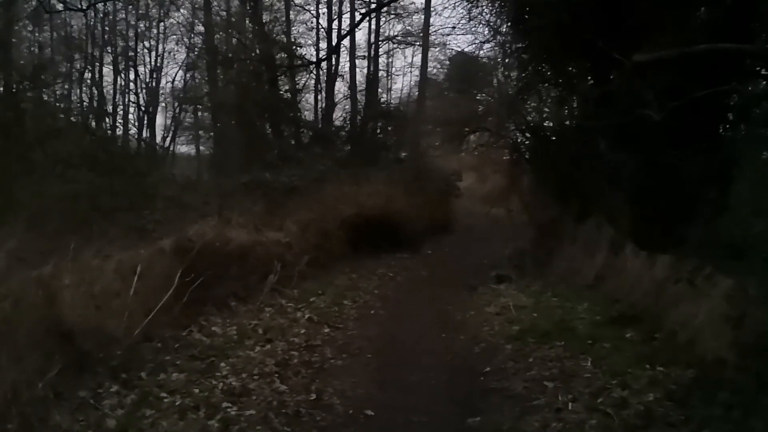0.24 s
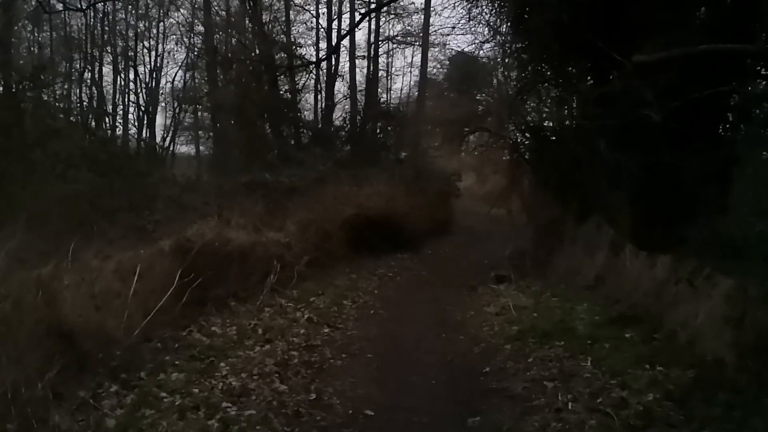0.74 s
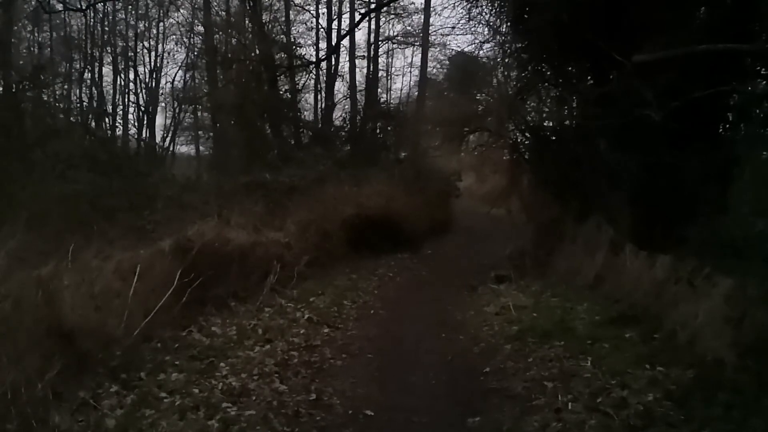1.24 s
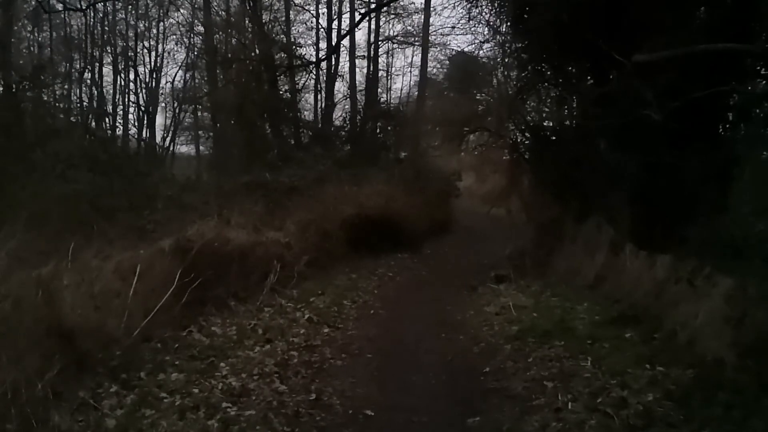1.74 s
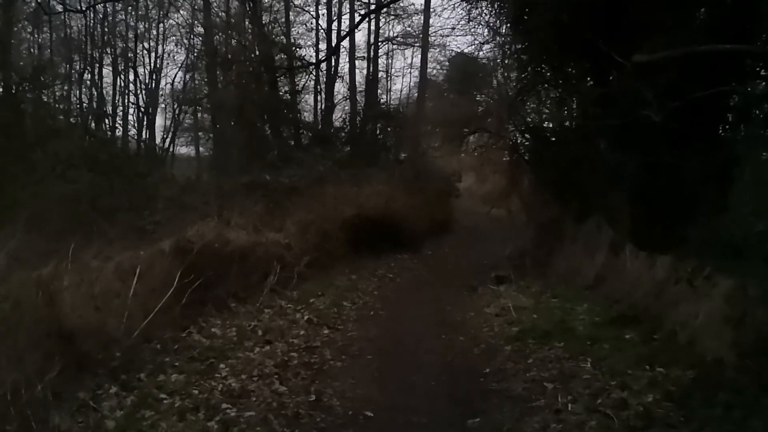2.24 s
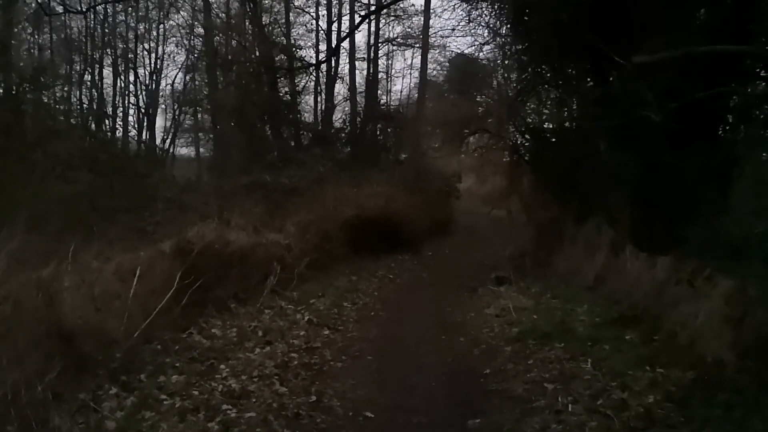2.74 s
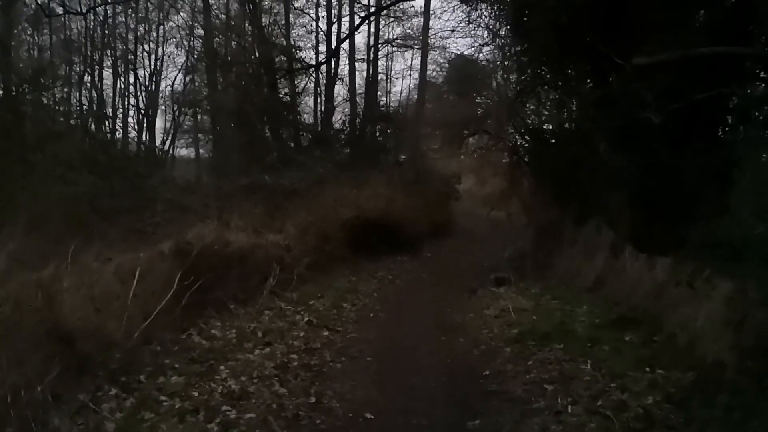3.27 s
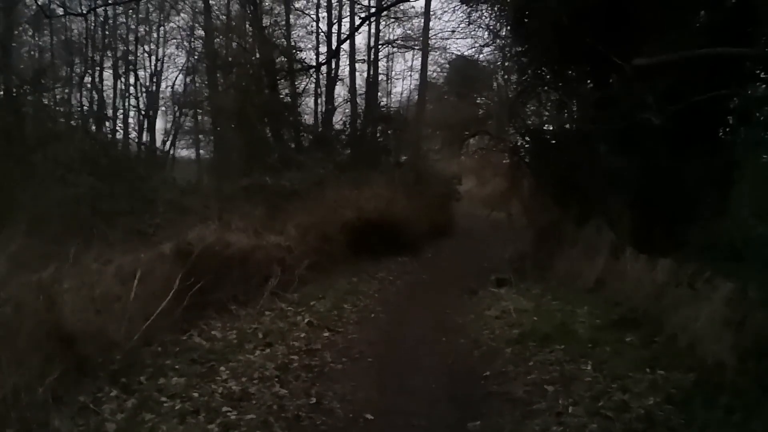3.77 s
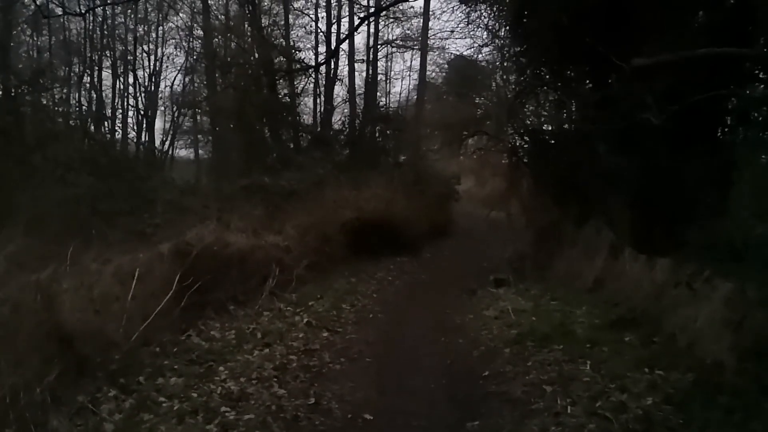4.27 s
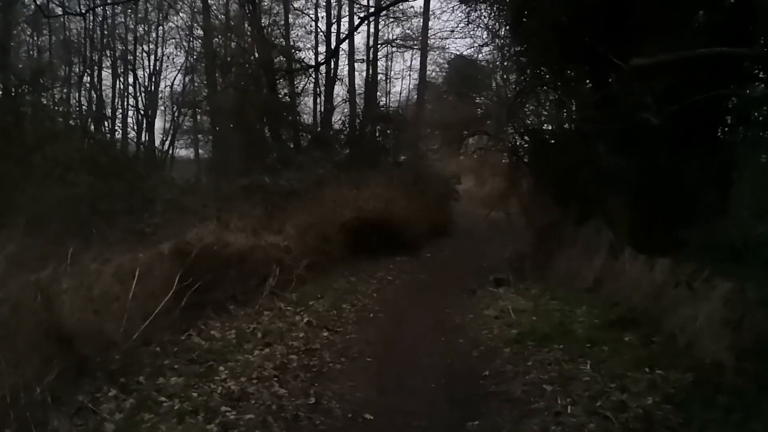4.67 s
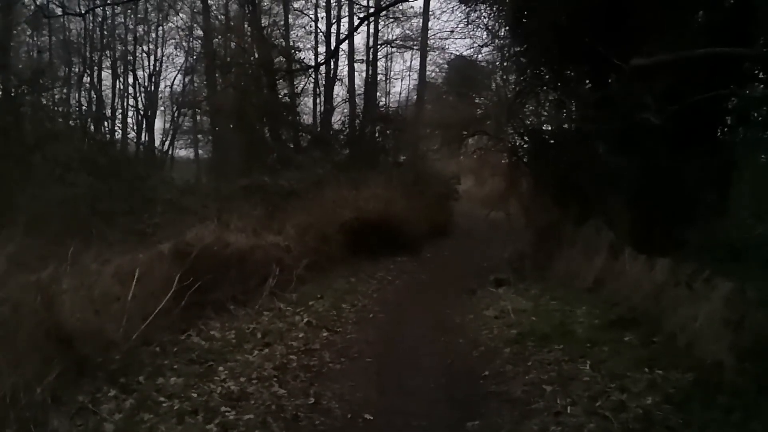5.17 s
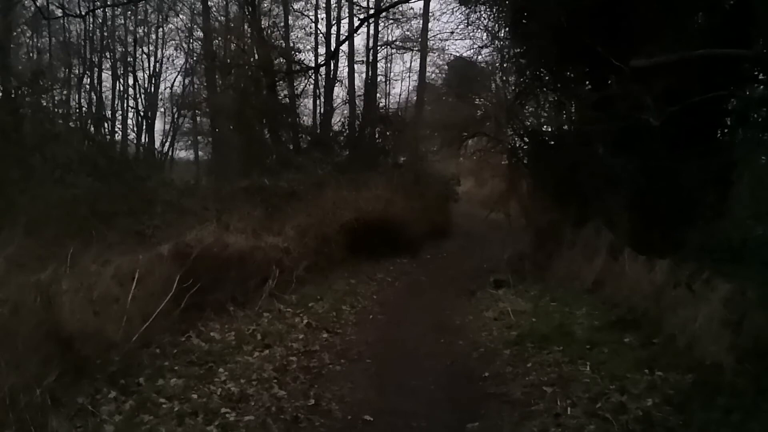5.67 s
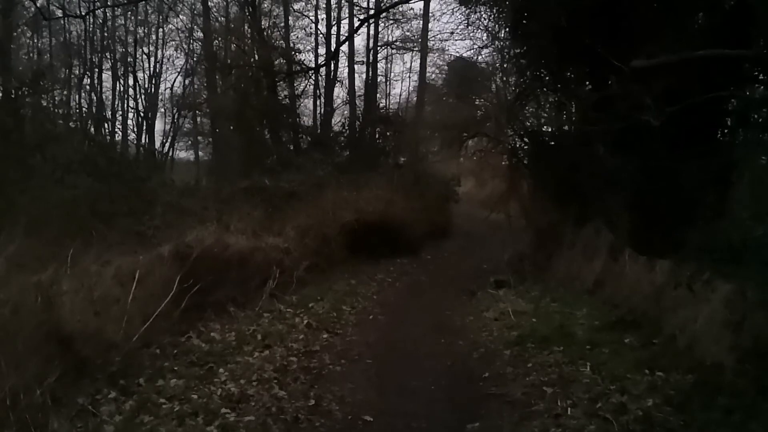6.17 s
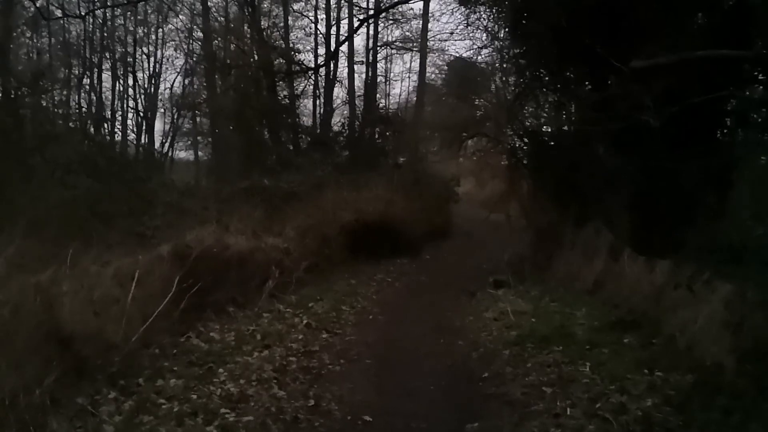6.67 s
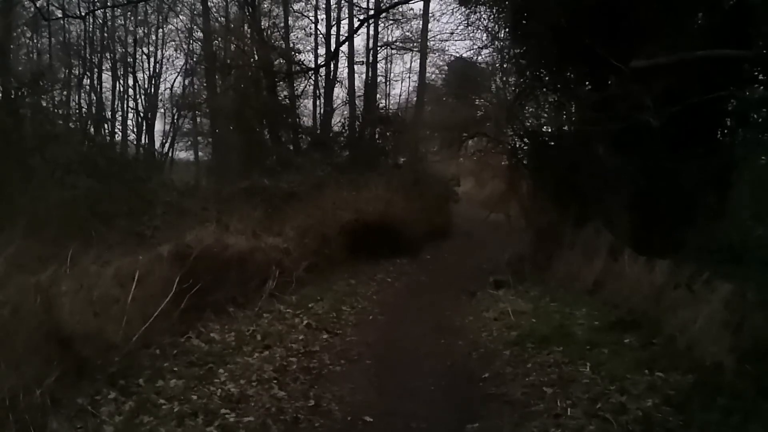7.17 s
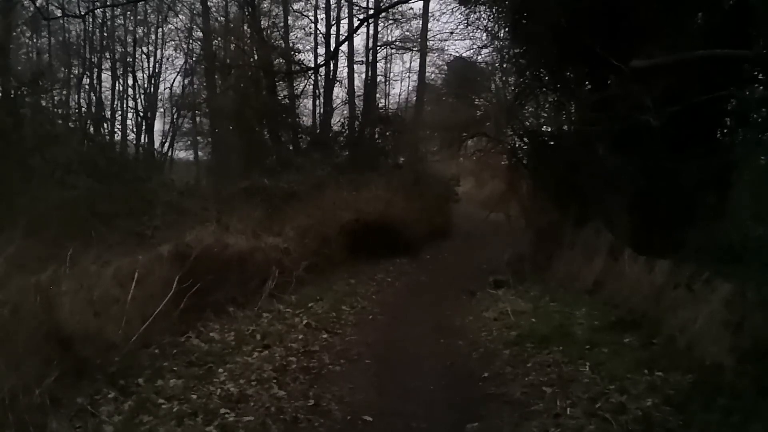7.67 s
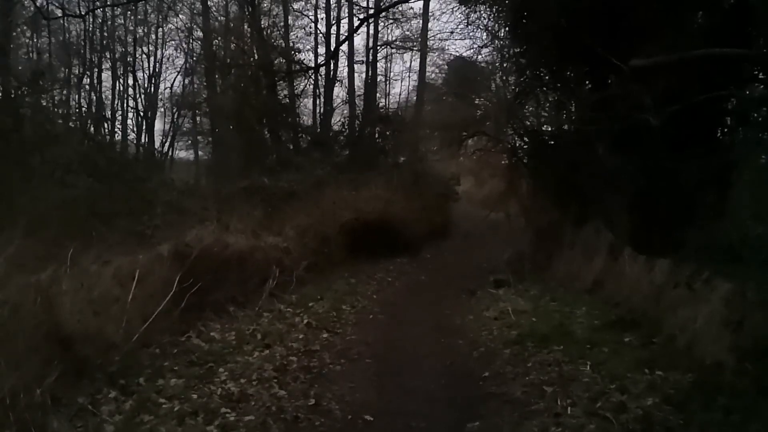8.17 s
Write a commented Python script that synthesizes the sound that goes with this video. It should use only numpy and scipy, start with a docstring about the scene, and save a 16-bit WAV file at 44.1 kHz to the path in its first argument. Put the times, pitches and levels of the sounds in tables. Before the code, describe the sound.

Two dogs trade sharp double barks in a dusky wood, echoing off the trunks and thinning out over low rumble and a faint water trickle.

```python
"""Dusk in a wood, heard by a spaced microphone pair. The tail of one double bark opens the scene. Then two animals
trade double barks near 1 kHz, one off to the left, one farther ahead: overtones and breath noise from a
throat, scattered by the trunks into a half-second noise tail; low thuds follow some of them. Throughout, water
(bubble tones) trickles on the right, ticks (ringing noise) snap, and a rumble, a hum and a far wash (shaped noise)
lie behind. Faint moans (narrow noise) come from about 1 s on, paired bird whistles from about 2.4 s on."""
import sys
import numpy as np
from scipy import signal
from scipy.fft import rfft, irfft, next_fast_len
from scipy.io import wavfile
from scipy.ndimage import uniform_filter1d

SR = 44100
rng = np.random.default_rng(int(sys.argv[2]) if len(sys.argv) > 2 else 0)


def makeup_ratio(level_db):
    """Linear amplitude ratio for a level in decibels (20 dB per factor of ten)."""
    decades = np.asarray(level_db, float) / 20
    return 10 ** decades


def log_audio(samples):
    """Write samples as a 16-bit WAV file to the path given in sys.argv[1]."""
    # one column per channel
    frames = np.atleast_2d(samples).T
    # limit to full scale, then quantise
    limited = np.clip(frames, -1, 1)
    pcm = np.round(limited * 32767).astype(np.int16)
    wavfile.write(sys.argv[1], SR, pcm)


N = 371322
LEAD = SR // 4  # samples played before time zero, for a bark already ringing

# Fading of scattered sound among leaves and over soft ground. Each row: frequency in Hz, change in dB per s.
TREBLE_LOSS = [(500, -30), (3000, -32), (6000, -43.5), (12000, -47)]


def evened(x):
    """Scales to rms 1."""
    return x / np.sqrt(np.mean(x ** 2) + 1e-20)


def read(points, hz):
    """Reads a spectrum table on a log-frequency axis."""
    f, value = np.transpose(points)
    return np.interp(np.log(hz + 1), np.log(f + 1), value)


def curve(rows):
    """Joins (s, value) rows by straight lines, one value a sample."""
    return np.interp(np.arange(N) / SR, *np.transpose(rows))


def empty_mix():
    """Two silent channels with the lead-in ahead."""
    return np.zeros((2, LEAD + N))


def add(mix, s, sound):
    """Mixes a two-channel sound in at s seconds, counted after the lead-in."""
    part = mix[:, LEAD + round(s * SR):][:, :sound.shape[1]]
    part += sound[:, :part.shape[1]]


def resonate(x, hz, width):
    """A steep resonance of gain 1: shift down, smooth twice, shift back."""
    turn = np.exp(2j * np.pi * hz * np.arange(len(x)) / SR)
    r = np.exp(-np.pi * abs(width) / SR)
    smooth = signal.lfilter([(1 - r) ** 2], [1, -2 * r, r * r], x / turn)
    return 2 * (turn * smooth).real


def sided(x, pan_db, lag_s):
    """Spaced pair: the right microphone hears x lag_s later and pan_db weaker (negative: sooner, louder)."""
    size = next_fast_len(len(x) + 128)
    delay = np.array([[0], [lag_s]]) + 32 / SR  # 32 samples to spare let the right one lead
    late = np.exp(-2j * np.pi * np.fft.rfftfreq(size, 1 / SR) * delay)
    return irfft(rfft(x, size) * late, size) * makeup_ratio([[pan_db / 2], [-pan_db / 2]])


def bark(level_db, length_s, bend_hz, voice, pipe, gasp, breath_db, jitter, rises):
    """A clean overtone stack on a bending pitch, plus breath puffed each cycle through the windpipe."""
    t = np.arange(round(length_s * SR)) / SR
    u = t / length_s
    pitch = np.polyval(np.polyfit([0, .5, 1], bend_hz, 2), u)
    falling = bend_hz[0] > bend_hz[1]  # a bark that starts by falling in pitch is hoarser and whistles
    wobble, shimmer, air = rng.standard_normal((3, SR // 8))[:, :len(u)]
    wobble = jitter * (1 + 2.2 * falling) * evened(uniform_filter1d(wobble, size=130))
    turns = np.cumsum(pitch * (1 + wobble)) / SR
    rise_s = rises[int(falling)]
    fall = np.minimum((1 - u) / .4, 1) ** .7
    catch = np.clip((t - .005) / rise_s, 0, 1)  # the voice catches after the air has started

    tone = evened(sum(makeup_ratio(falling_db if falling else rising_db) * np.cos(2 * np.pi * k * turns + 0.893 * k * k)
                      for k, falling_db, rising_db in voice))
    tone = tone * (1 + .22 * evened(uniform_filter1d(shimmer, size=160)))  # uneven strength, cycle to cycle
    puffs = (0.25 + np.exp(-(turns % 1) / 0.11)) * air
    breath = evened(sum(makeup_ratio(db) * evened(resonate(puffs, hz, width)) for hz, width, db in pipe))
    breath = makeup_ratio(breath_db) * breath * np.minimum(t / rise_s, 1)
    # the first air through the nearly shut mouth
    whistle = sum(makeup_ratio(db) * evened(resonate(air, hz, width)) * t / peak_s * np.exp(1 - t / peak_s)
                  for hz, width, db, peak_s in gasp)

    x = (tone * catch + breath + falling * whistle) * fall
    # a small mouth radiates no bass; the band ends softly near 12 kHz
    band = signal.butter(4, [600, 12000], "bandpass", fs=SR, output="sos")
    return makeup_ratio(level_db) * signal.sosfilt(band, x)


def trees(x, loss, lag_s):
    """Countless trunks return the sound as a noise tail; the first returns are partly alike, lag_s apart."""
    # Each row: delay in s, level at the left in dB, level at the right in dB.
    returns = [(.004, -4, -6), (.03, 0, -2), (.12, -9, -5.5), (.2, -18, -18), (.35, -28, -28),
               (.8, -48, -48)]
    left, other = rng.standard_normal((2, SR * 4 // 5))
    same = .7 * np.exp(-np.arange(len(left)) / SR / .05)  # likeness of the two microphones
    right = same * np.roll(left, round(lag_s * SR)) + np.sqrt(1 - same ** 2) * other
    hz, t, z = signal.stft(np.array([left, right]), SR, nperseg=128)
    tail = signal.istft(z * makeup_ratio(t * read(loss, hz)[:, None]), SR, nperseg=128)[1]
    s, left_db, right_db = np.transpose(returns)
    t = np.arange(tail.shape[1]) / SR
    tail = tail * makeup_ratio([np.interp(t, s, db, left=-99) for db in (left_db, right_db)])
    # trunks stand in clumps, so the returns flutter
    clumps = evened(uniform_filter1d(rng.standard_normal(len(t)), size=500))
    tail = tail * makeup_ratio(3 * clumps)
    return signal.fftconvolve(x[None], tail / np.sqrt(SR / 10), axes=1)


def animal(barks, shape, pan_db, lag_s, wet_db, loss, **throat):
    """Each pair is two barks; each arrives direct from its side, then from the trees all round."""
    mix = empty_mix()
    for s, gap, first_db, second_db, pitch_hz in barks:
        for when, db, (length_s, *bend) in zip((s, s + gap), (first_db, second_db), shape):
            x = bark(db, length_s, np.multiply(bend, pitch_hz), **throat)
            add(mix, when, sided(x, pan_db, lag_s))
            add(mix, when, makeup_ratio(wet_db) * trees(x, loss, lag_s))
    return mix[:, LEAD:]


def left_animal():
    """The nearer throat, off to the left: sound reaches the left microphone first and stronger."""
    # Each row: start in s, s to the second bark, level of the first in dB, of the second in dB, pitch in Hz.
    barks = [(-.185, 0.13, -33, -33, 1005), (.608, 0.12, -29, -29.5, 1002),
             (1.862, 0.1, -33.5, -30.5, 1020), (3.622, .1, -34.5, -30.5, 990),
             (6.522, 0.096, -35.5, -30.5, 993)]
    # First and second bark, each row: length in s, then start, middle and end as shares of the pitch.
    shape = [(0.055, 1.009, .987, .912), (0.066, .935, 1.001, 0.93)]
    # Overtones, each row: multiple of the pitch, relative dB if the pitch starts falling, dB if rising.
    voice = [(1, 3.5, 1), (2, 2.5, 2), (3, -10.5, -14.5), (4, 5, 3.5), (5, -4.5, -3), (6, -34, -16.5),
             (7, -13, -16.5), (8, -42, -29), (9, -41, -25)]
    # Windpipe resonances, each row: frequency in Hz, width in Hz, relative level in dB.
    pipe = [(637, 46, -18.5), (883, 115, -9), (1620, 370, -0.5), (3120, 920, -14), (3740, 700, 5.5),
            (5430, 900, -3), (7300, 300, -13), (9420, 200, -19.5)]
    # Whistle of the first air, each row: frequency in Hz, width in Hz, dB against the voice, s to its peak.
    gasp = [(2894, 51, -3.5, 0.0022), (5300, 270, -21, 0.0015)]
    return animal(barks, shape, pan_db=3.5, lag_s=.000363, wet_db=0.5, loss=TREBLE_LOSS,
                  voice=voice, pipe=pipe, gasp=gasp, breath_db=-7.0, jitter=.008,
                  rises=(.022, .008))  # s, for a rising and a falling start


def ahead_animal():
    """The farther throat, nearly straight ahead: breathier, weaker, with less of the scattered tail."""
    # Each row: start in s, s to the second bark, level of the first in dB, of the second in dB, pitch in Hz.
    barks = [(.432, .056, -42.5, -40, 1022), (4.876, .052, -44, -40, 1034)]
    # First and second bark, each row: length in s, then start, middle and end as shares of the pitch.
    shape = [(.084, 1.017, 1, .93), (.059, .968, 0.96, 1.005)]
    # Overtones, each row: multiple of the pitch, relative dB if the pitch starts falling, dB if rising.
    voice = [(1, -13, -5), (2, -17.5, 2.5), (3, -13.5, -0.5), (4, -9.5, 0.5), (5, -15, -3), (6, -16, -22),
             (7, -30, -31), (8, -26, -10), (9, -40, -23)]
    # Windpipe resonances, each row: frequency in Hz, width in Hz, relative level in dB.
    pipe = [(699, 48, -12.5), (794, 73, -16), (1080, 120, -2), (1600, 53, -12.5), (2740, 890, -3),
            (3720, 940, 4.5), (5440, 320, -0.5), (7050, 710, -1), (9150, 380, -52)]
    # Whistle of the first air, each row: frequency in Hz, width in Hz, dB against the voice, s to its peak.
    gasp = [(1112, 53, -5, 0.008), (4080, 81, -3, 0.0036)]
    # Fading of its scattered sound, each row: frequency in Hz, change in dB per s.
    loss = [(500, -50), (1500, -45), (3000, -30), (4100, 0), (6000, -25), (12000, -70)]
    return animal(barks, shape, pan_db=1.5, lag_s=-.00007, wet_db=-1.5, loss=loss,
                  voice=voice, pipe=pipe, gasp=gasp, breath_db=-1.0, jitter=.006,
                  rises=(.016, .009))  # s, for a rising and a falling start


def drip(db, hz, cycles, rise):
    """A bubble: a few cycles that die fast and bend upward."""
    u = np.arange(round(4 * cycles * SR / hz)) * hz / SR / cycles  # time in decay lengths
    start = 1 - np.exp(-u / .1)
    return makeup_ratio(db) * np.sin(2 * np.pi * cycles * (u + rise * u ** 2)) * start * np.exp(-u)


def trickle(per_s, small_db, spread_db):
    """Bubbles in water: the loudest at their moments, many small ones at random, to the right."""
    # Loudest drips, each row: s (the drip starts 2 ms sooner), dB before decay and panning, starting pitch in Hz.
    loudest = [(1.0091, -53.5, 2130), (1.2092, -54, 2100), (1.4247, -56, 2216), (2.6, -57, 1600),
               (2.6404, -59, 1900), (2.825, -55, 2080), (2.9667, -55, 1410), (3.0834, -55.5, 2030),
               (3.1323, -52, 2060), (3.5478, -52.5, 1160), (4.2388, -53, 2910), (4.356, -55, 2170),
               (4.6234, -57, 1960), (5.3203, -52.5, 2020), (5.8935, -58, 2080), (5.913, -56, 2220),
               (6.3175, -52.5, 1550), (6.3684, -50, 1600), (6.9995, -56, 2200), (7.428, -57, 2010),
               (7.6565, -57.5, 1610), (7.7298, -57, 2530), (7.9229, -57, 2260)]
    mix = empty_mix()
    for s, db, hz in loudest:
        add(mix, s - .002, sided(drip(db, hz, cycles=9.8, rise=0.013), pan_db=-10, lag_s=-0.00044))
    for when, size, a, b, pan in rng.random((4000, 5))[:round(per_s * N / SR)]:
        db = small_db - spread_db * np.log(1 - .95 * size)  # few are loud
        small = drip(db, hz=1100 * 1.7 ** (a + b), cycles=8 + 14 * pan, rise=.01)
        add(mix, when * N / SR, sided(small, -6 * pan, -.0003 * pan))
    return mix[:, LEAD:]


def ticks(count=12):
    """Short bright snaps to the right, noise ringing for some milliseconds; count more fall at random."""
    # Dry ticks in the leaves, each row: start in s, level in dB before decay and panning, frequency in Hz.
    placed = [(.859, -50, 9200), (1.742, -72, 6600), (3.518, -71, 6650), (5.848, -74, 6700),
              (5.905, -70, 7300), (5.922, -72, 6800)]
    mix, t = empty_mix(), np.arange(600) / SR
    scattered = [(a * N / SR, -67 - 4 * b, 6600 * (0.96 + 0.18 * c)) for a, b, c in rng.random((count, 3))]
    for s, db, hz in [*placed, *scattered]:
        x = evened(resonate(rng.standard_normal(600), hz, 1400)) * np.exp(-t / 0.0032)
        add(mix, s, sided(makeup_ratio(db) * x, pan_db=-14.5, lag_s=-0.00018))
    return mix[:, LEAD:]


def songbird():
    """Two whistles at once that flick up and slide down, blurred by the trees."""
    # Each row: start in s, dB of the lower tone before panning, length in s, dB of the upper tone (1.5 is added).
    chirps = [(2.353, -68, 0.059, -4), (2.592, -70.5, .045, -5), (4.03, -72.5, 0.054, -2),
              (4.261, -74.5, 0.035, -14), (7.768, -72, .06, 7), (7.996, -75, 0.05, -6)]
    top_hz, peak_s, rise_hz_per_s, fall_hz_per_s = 4470, .016, 11000, 11000  # before the peak is rounded
    mix = empty_mix()
    for s, db, length_s, upper_db in chirps:
        t = np.arange(round(length_s * SR)) / SR - peak_s
        sag = np.maximum(-rise_hz_per_s * t, fall_hz_per_s * t)
        turns = np.cumsum(top_hz - uniform_filter1d(sag, size=300, mode="nearest")) / SR
        lower = np.sin(2 * np.pi * turns)
        upper = makeup_ratio(upper_db + 1.5 - 320 * abs(t)) * np.sin(2 * np.pi * 1.36 * turns)
        x = makeup_ratio(db) * (lower + upper) * signal.windows.tukey(len(t), .6)
        add(mix, s, sided(x, pan_db=-3.2, lag_s=-0.00021))
        add(mix, s, makeup_ratio(2) * trees(x, TREBLE_LOSS, -.00025))
    return mix[:, LEAD:]


def moans():
    """Far, faint, fuzzy: narrow noise tones that swell and fade, centred."""
    # Each row: start in s, level in dB before the swell, length in s, frequency in Hz, width in Hz.
    calls = [(0.946, -70, 0.45, 1280, 41.6), (2.43, -72.5, 0.083, 330, 59.6), (4.75, -65.5, 0.56, 333, 88),
             (7.58, -70, 0.12, 338, 60)]
    mix = empty_mix()
    for s, db, length_s, hz, width in calls:
        x = evened(resonate(rng.standard_normal(SR)[:round(length_s * SR)], hz, width))
        add(mix, s, sided(makeup_ratio(db) * x * np.hanning(len(x)), 0, 0))
    return mix[:, LEAD:]


def thuds():
    """A dip in air pressure with a swing before and after, alike at both microphones."""
    # Low thuds, each just after a bark. Each row: s of the dip, peak in dB, frequency in Hz.
    dips = [(.547, -46.5, 54), (.819, -42, 41), (2.066, -45, 50.7), (3.692, -43.5, 48), (3.848, -47.5, 44),
            (4.99, -45.5, 58), (6.699, -42.5, 55)]
    s, db, hz = np.transpose(dips)[:, :, None]
    turns = (np.arange(N) / SR - s) * hz
    swell = np.exp(-(turns / 0.6) ** 2)  # 0.6 cycles either way
    return -(makeup_ratio(db) * np.cos(2 * np.pi * turns) * swell).sum(axis=0)


def noise(points, patchy_db):
    """Random short-time spectra of the given colour, with drifting patches, at rms 1."""
    frames, hz = N // 512 + 5, np.fft.rfftfreq(2048, 1 / SR)
    a, b, patches = rng.standard_normal((frames, 1025, 3)).T
    patches = uniform_filter1d(patches, size=16, axis=0)
    patches = evened(uniform_filter1d(patches, size=5, axis=1))
    z = (a + 1j * b) * makeup_ratio(read(points, hz)[:, None] + patchy_db * patches)
    return evened(signal.istft(z, nperseg=2048, noverlap=1536)[1][:N])


def distance():
    """Rumble and hum reach both microphones nearly alike; the far wash above them differs between the two."""
    # Colour of the rumble, each row: frequency in Hz, relative level in dB per Hz.
    rumble_colour = [(11, -20), (18, 0), (54, 5), (102, -13.5), (114, -8.5), (134, -20), (170, -21),
                     (220, -32.5), (370, -120)]
    # Swell of the rumble, each row: time in s, level in dB.
    rumble_swell = [(0, -62), (.5, -57), (1.55, -60), (2.86, -59), (3.1, -61), (5, -60), (8.42, -60.5)]
    # Swell of the hum, each row: time in s, level in dB.
    hum_swell = [(0, -73), (3.2, -74.5), (3.8, -66.5), (8.42, -65)]
    # Wash in the sum of the two microphones, each row: frequency in Hz, relative level in dB per Hz.
    mid_colour = [(76, -33), (130, 1.5), (169, -5.5), (340, -8.5), (538, -19), (1000, -12.5), (1500, -15.5),
                  (2100, -7), (2900, -15.5), (3680, -20.5), (5710, -22.5), (8360, -30), (15500, -36)]
    # Wash in their difference, each row: frequency in Hz, relative level in dB per Hz.
    side_colour = [(12, -56), (20, -11), (98, -2.5), (315, -7.5), (987, -4), (1340, -9), (1580, -7.5),
                   (3760, -14), (5700, -17), (6740, -21.5), (15500, -28.5)]
    rumble = makeup_ratio(curve(rumble_swell)) * noise(rumble_colour, patchy_db=0.15)
    hum = makeup_ratio(curve(hum_swell)) * evened(resonate(rng.standard_normal(N), hz=94.34, width=10.5))
    mid = makeup_ratio(-70) * noise(mid_colour, patchy_db=0.0)
    side = makeup_ratio(-71) * noise(side_colour, patchy_db=1.8)
    side = side + makeup_ratio(-90.0) * noise(rumble_colour, patchy_db=-1.5)  # a trace of rumble differs too
    return rumble + hum + mid + side * np.array([[1], [-1]])


def scene():
    """Two barking animals, the small sounds and the distance."""
    barking = left_animal() + ahead_animal()
    water = trickle(per_s=200, small_db=-73, spread_db=4)
    return barking + water + ticks() + songbird() + moans() + thuds() + distance()


def band_limit(x):
    """A steep low-pass at the top of the band."""
    return signal.sosfilt(signal.butter(12, 15690, fs=SR, output="sos"), x)


def record(dry):
    """The finished mix of the microphone pair."""
    return band_limit(dry)


dry = scene()
out = record(dry)
log_audio(out)
```